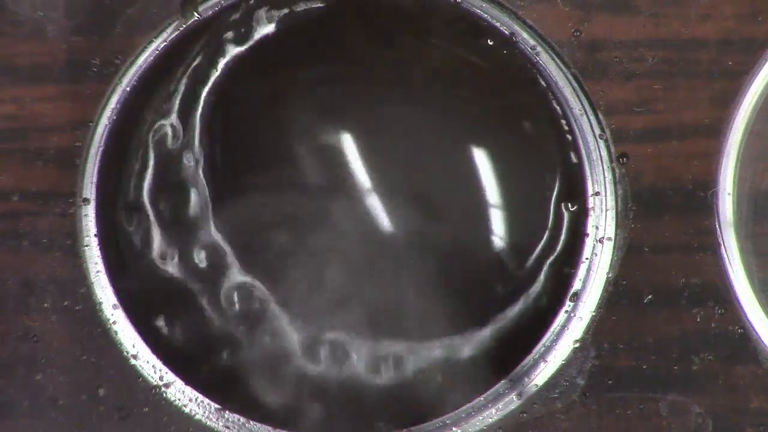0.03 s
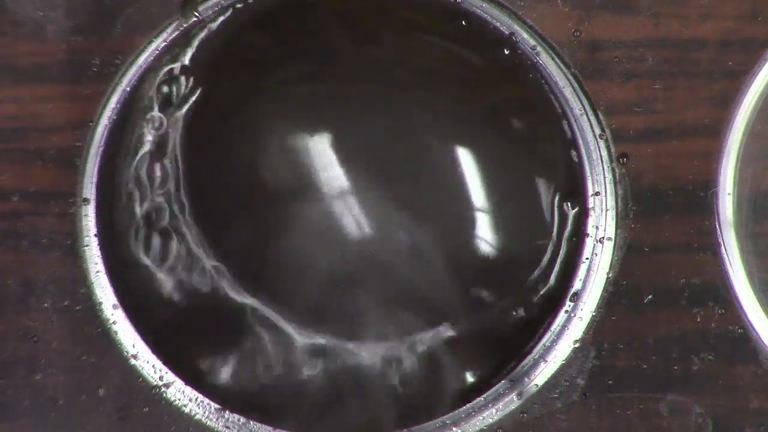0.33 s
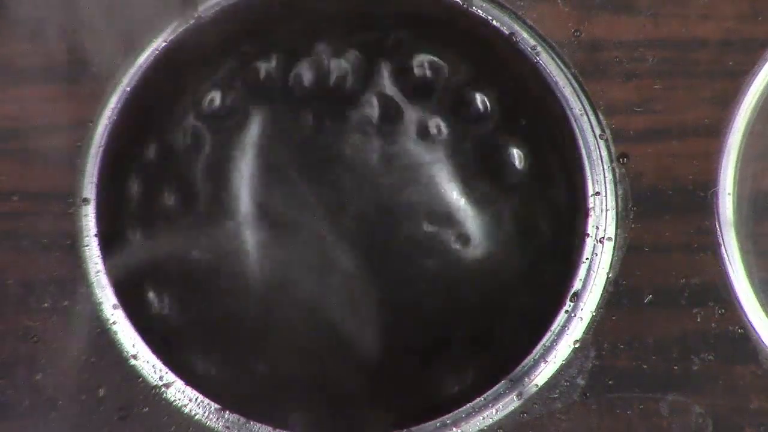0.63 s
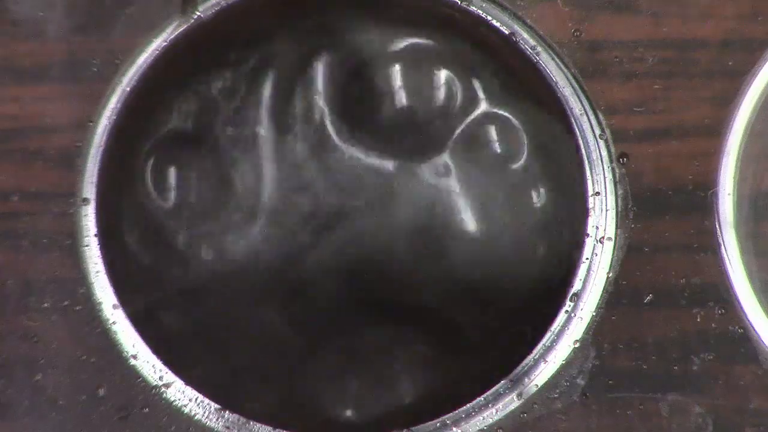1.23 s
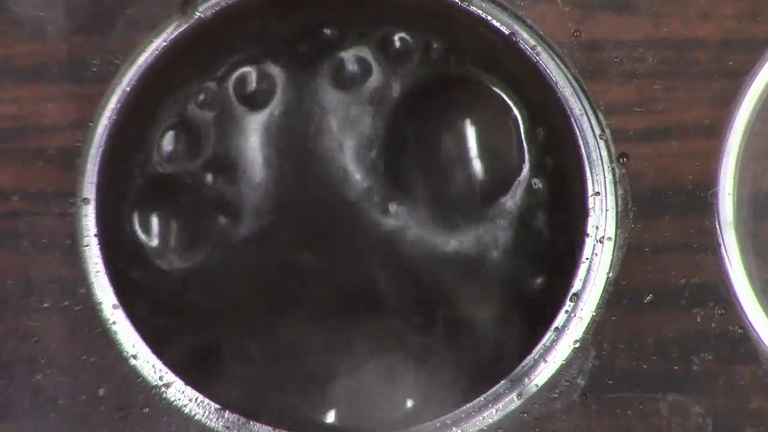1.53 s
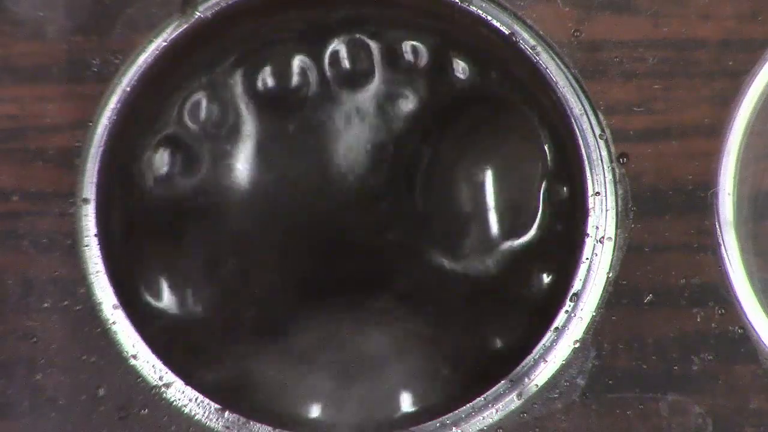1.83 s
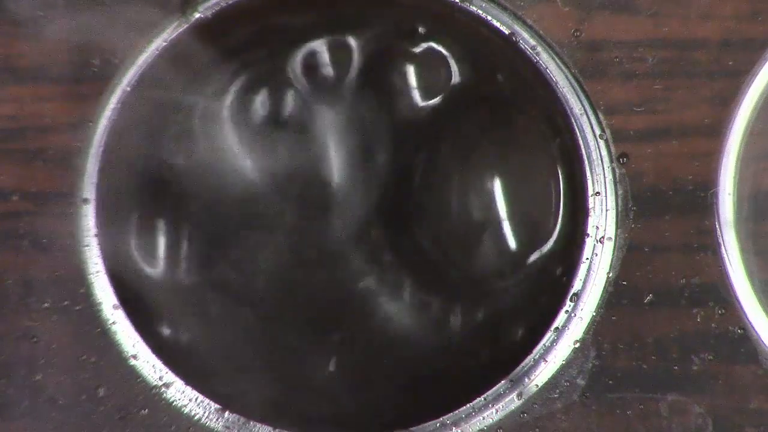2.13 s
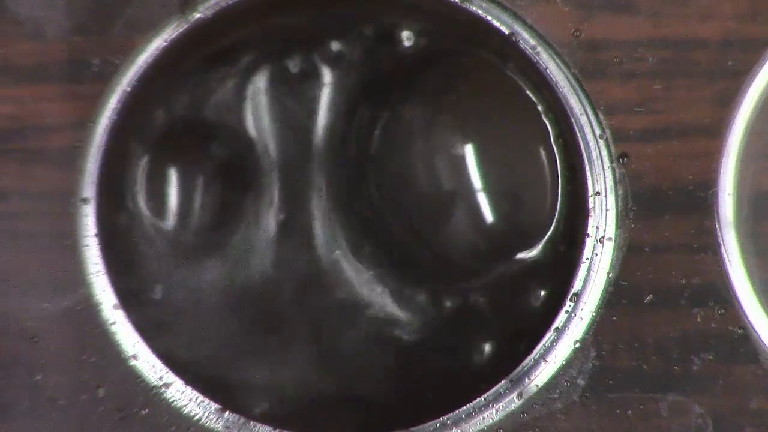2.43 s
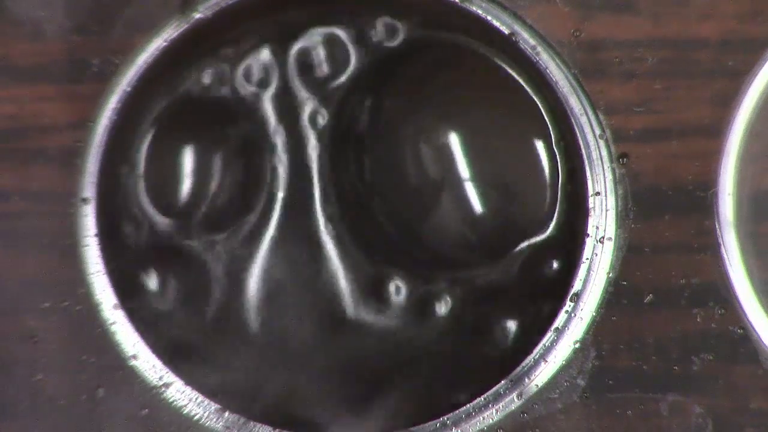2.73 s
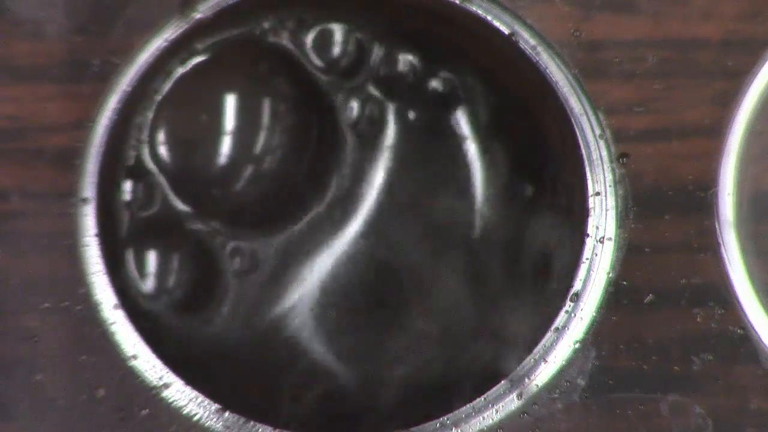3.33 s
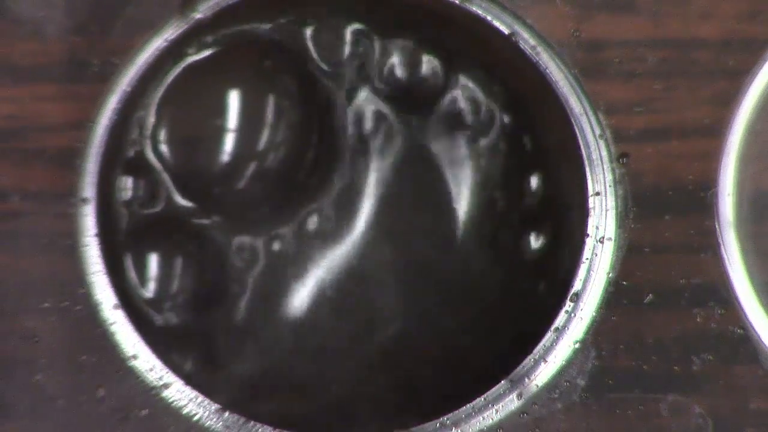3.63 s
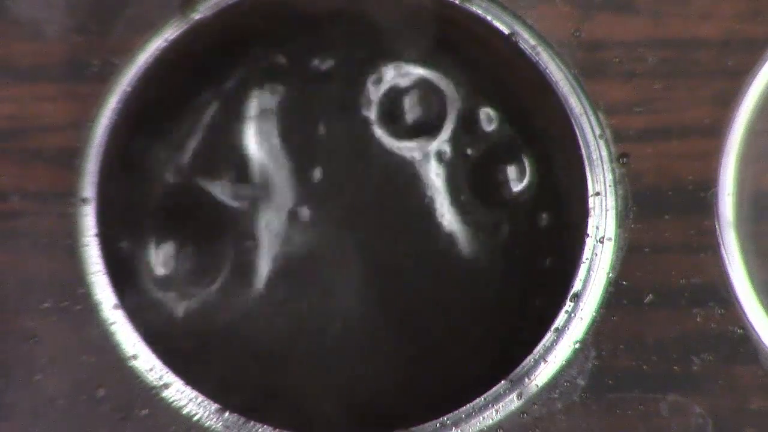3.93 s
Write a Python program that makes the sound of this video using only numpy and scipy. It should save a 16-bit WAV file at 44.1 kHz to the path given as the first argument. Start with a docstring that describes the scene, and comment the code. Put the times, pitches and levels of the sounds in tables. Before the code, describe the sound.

Close fizzing of tiny bubbles bursting in a glass, over a faint low hum.

```python
"""Fizzing glass, close from above

A quiet room, the microphone close over a glass of dark liquid. Countless tiny bubbles burst in
surges, coloured by the air in the glass; a few snap louder. At first one big dome covers the surface,
squeaking and giving a coarser fizz that drops as it bursts; a soft thump follows. A low drone wavers
underneath, and dull room noise lies around the glass."""
import sys
import numpy as np
from scipy import signal
from scipy.io import wavfile

SR = 44100
rng = np.random.default_rng(int(sys.argv[2]) if len(sys.argv) > 2 else 0)


def to_wav(sig):
    """Store sig (one row per channel, or 1-D mono) as 16-bit WAV at the path in sys.argv[1].

    Samples outside -1..1 are clipped; the rate is SR.
    """
    pcm = np.clip(np.atleast_2d(sig), -1, 1) * 32767
    pcm = np.round(pcm).astype(np.int16)
    wavfile.write(sys.argv[1], SR, pcm.T)  # frames by channels


N = 176400
FLUTTER_DB, FLUTTER_PER_S = 0.95, 59   # quick unsteadiness of both kinds of fizz


def from_db(db):
    """Decibels to gain."""
    return 10 ** (np.asarray(db) / 20)


def rms_one(x):
    """Scale to unit power."""
    return x / np.sqrt(np.mean(x ** 2) + 1e-20)


def in_time(rows):
    """Join rows of (seconds, value) by straight lines, at every sample."""
    return np.interp(np.arange(N) / SR, *np.transpose(rows))


def at_hz(points, hz):
    """Read rows of (Hz, value) on a log-frequency axis."""
    freqs, values = np.transpose(points)
    return np.interp(np.log(hz), np.log(freqs), values)


def swell(peak_s, length_s):
    """A bell-shaped gain that stays above half power for length_s."""
    return .5 ** (2 * ((np.arange(N) / SR - peak_s) / length_s) ** 2)


def drift(per_s):
    """A smooth random wander with spread 1; per_s sets its pace."""
    step = 40   # samples between values
    pole = np.exp(-2 * np.pi * per_s * step / SR)
    noise = rng.standard_normal(N // step + 2002)
    slow = signal.lfilter([1], [1, -2 * pole, pole * pole], noise)[2000:]
    return np.interp(np.arange(N) / step, np.arange(len(slow)), rms_one(slow))


def band(x, low_hz, high_hz):
    """Band-pass."""
    return signal.sosfilt(signal.butter(2, [low_hz, high_hz], "band", fs=SR, output="sos"), x + 1e-18)


def soften(x, top_hz):
    """Low-pass."""
    return signal.sosfilt(signal.butter(2, top_hz, fs=SR, output="sos"), x + 1e-18)


def resonate(x, hz, width_hz):
    """A resonance with gain 1 at its peak."""
    r = np.exp(-np.pi * width_hz / SR)
    feedback = [1, -(1 + r * r) * np.cos(2 * np.pi * hz / SR), r * r]
    return signal.lfilter(np.array([1, 0, -1]) * (1 - r * r) / 2, feedback, x + 1e-18)


def glass(x):
    """The air in the glass lifts some pitches and cancels others on the way up to the microphone."""
    # Each row: pitch of an air resonance in Hz, width in Hz, lift in dB (negative for a notch).
    air_resonances = [(947, 57, 9), (1459, 110, 7.5), (1788, 36, 7), (2160, 41, 6.5), (2660, 110, 5),
                      (3007, 25, 5.5), (3350, 190, 4.5), (3972, 60, 7), (4150, 120, 5), (4570, 140, 6),
                      (4885, 60, 4.5), (5240, 90, 4), (5560, 60, 3.5), (6090, 90, 6), (6260, 130, -10),
                      (6460, 70, 5), (6670, 50, 5), (6850, 110, -6), (7000, 80, 4), (7722, 53, 7),
                      (8070, 200, 3.5), (8635, 45, 7.5), (9530, 240, 4.5), (12600, 800, -9.5)]
    for hz, width_hz, lift_db in air_resonances:
        x = x + (from_db(lift_db) - 1) * resonate(x, hz, width_hz)
    return x


def bursts(per_s, spread_db):
    """Bubbles burst as random clicks, many small and few large."""
    sizes = from_db(spread_db * np.minimum(rng.exponential(1, N), 5))
    return sizes * rng.choice([-1, 1], N) * (rng.random(N) < per_s / SR)


def bubbles(colour, per_s, spread_db):
    """Bursting bubbles in 16 size classes, each ringing briefly in its own band; unit power."""
    edges = np.geomspace(850, 16000, 17)
    out = 0
    for low, high in zip(edges, edges[1:]):
        clicks = rms_one(bursts(per_s * (high - low) / np.ptp(edges), spread_db))
        patchy_db = .5 * drift(per_s=28)   # each class comes and goes a little on its own
        gain = from_db(at_hz(colour, np.sqrt(low * high)) + patchy_db)
        out = out + gain * band(clicks, low, high)
    return rms_one(glass(out))


def film_ring(clicks, hz):
    """A snapping film rings for a few cycles; its top is soft."""
    cycles = 8.1   # to die away by 60 dB
    r = np.exp(-np.log(1000) * hz / (cycles * SR))
    ring = signal.lfilter([.5, 0, -.5], [1, -2 * r * np.cos(2 * np.pi * hz / SR), r * r], clicks + 1e-18)
    return soften(ring, top_hz=13300)


def vigour():
    """Strength of the fine fizz: a fluttering bed that surges whenever a patch of foam collapses."""
    # The bed of fizz. Each row: time in seconds, level in dB.
    bed = [(0, -54.5), (.35, -57), (.53, -58.5), (.6, -54.5), (1.3, -54.5), (1.8, -57.5), (2.3, -55),
           (2.85, -56), (3.4, -55.5), (4, -58)]
    # Collapsing foam. Each row: peak time in seconds, length in seconds, level in dB.
    surges = [(0.08, .012, -56), (.241, .036, -56.5), (.483, 0.022, -54), (0.561, 0.018, -49.5),
              (.67, .018, -54.3), (.729, 0.075, -54.5), (0.802, .028, -55.5), (.931, 0.038, -54.5),
              (1.038, 0.058, -55), (1.177, 0.0095, -49.5), (1.227, .025, -53.5), (1.297, 0.047, -53),
              (1.378, 0.014, -55.2), (1.474, 0.075, -55.5), (1.61, .05, -52), (1.687, .06, -56.5),
              (1.758, .035, -51.5), (1.871, 0.054, -54), (1.962, 0.035, -51.5), (2.05, .047, -52.5),
              (2.13, 0.064, -56), (2.199, 0.012, -51.6), (2.284, .028, -52.5), (2.438, 0.015, -56),
              (2.659, .07, -55.5), (2.805, .035, -56.5), (2.932, 0.039, -52.5), (3.091, .03, -51),
              (3.22, .059, -62), (3.624, .028, -55.5), (3.768, .04, -57), (3.85, .038, -56),
              (3.968, .045, -57.5)]
    power = from_db(in_time(bed)) ** 2
    for peak_s, length_s, db in surges:
        power = power + (from_db(db) * swell(peak_s, length_s)) ** 2
    return np.sqrt(power) * from_db(FLUTTER_DB * drift(FLUTTER_PER_S))


def fine_fizz():
    """Tiny bubbles hiss just below the microphone, with a light crackle of small snapping films."""
    # Spectrum of the tiny bubbles. Each row: pitch in Hz, relative spectral level in dB.
    colour = [(1000, -16.5), (2500, -11), (4200, -14.5), (5500, -6), (6800, -0.5), (8100, 1), (10000, -5.5),
              (11600, -2.5), (13400, -5.5), (15000, -22)]
    crackle_hz, crackle_db = (6300, 7800, 9050, 10200), -13.5
    crackle = rms_one(sum(film_ring(bursts(per_s=40, spread_db=2.5), hz) for hz in crackle_hz))
    hiss = bubbles(colour, per_s=36000, spread_db=2)
    return vigour() * (hiss + from_db(crackle_db) * crackle)


def coarse_fizz():
    """Larger bubbles give a hollow fizz, strongest under the dome, which is gone by 0.6 s."""
    # Spectrum of the larger bubbles. Each row: pitch in Hz, relative spectral level in dB.
    colour = [(1000, -3.5), (2000, -2.5), (3600, -2.5), (5000, -1.5), (7000, -7), (15000, -16)]
    # Strength of the coarse fizz. Each row: time in seconds, level in dB.
    levels = [(0, -58.2), (.2, -56.3), (.33, -56.8), (.44, -59), (.53, -59), (.6, -65), (1.2, -63.5),
              (2.05, -65), (2.6, -69.5), (3.2, -68.5), (4, -86)]
    fizz = bubbles(colour, per_s=5800, spread_db=1)
    hollow = rms_one(fizz + 0.42 * (glass(fizz) - fizz))   # a share rings twice in the glass
    return from_db(in_time(levels) + FLUTTER_DB * drift(FLUTTER_PER_S)) * hollow


def drone():
    """One low tone that wavers in pitch, swells and sinks, on a narrow rumble."""
    # Swells of the tone. Each row: time in seconds, level in dB.
    levels = [(0, -52), (.07, -53), (.17, -65), (.21, -52), (.28, -54.5), (.33, -57), (.41, -53),
              (.47, -46.5), (.52, -62), (.56, -54), (.62, -47), (.69, -75), (.78, -56.5), (.86, -60),
              (.92, -47.5), (.99, -56.5), (1.07, -48.5), (1.12, -62), (1.18, -44), (1.28, -59.5),
              (1.35, -53), (1.51, -55.5), (1.57, -43), (1.63, -67), (1.69, -46), (1.74, -64), (1.82, -49),
              (1.9, -52.5), (1.95, -43.5), (2.0, -46.5), (2.03, -55.5), (2.09, -48), (2.135, -57.5),
              (2.18, -46), (2.23, -50.5), (2.33, -52), (2.46, -55), (2.53, -48), (2.58, -52), (2.62, -44.5),
              (2.68, -43.5), (2.73, -55), (2.79, -58), (2.83, -48.5), (2.88, -47.5), (2.93, -60),
              (2.97, -50), (3.05, -65), (3.14, -52.5), (3.24, -50.5), (3.28, -61), (3.46, -61),
              (3.52, -50.5), (3.585, -63), (3.63, -50.5), (3.77, -55.5), (3.84, -45.5), (3.87, -59),
              (3.91, -47), (3.95, -67), (4, -47.5)]
    pitch_hz, waver_hz, flicker_db = 145.8, 4.58, 0.6
    rumble_db, rumble_width_hz = -59.5, 44.3
    hz = pitch_hz + waver_hz * drift(per_s=19)
    gain = from_db(in_time(levels) + flicker_db * drift(per_s=19))
    tone = np.sqrt(2) * np.sin(2 * np.pi * np.cumsum(hz) / SR)
    rumble = band(rng.standard_normal(N), pitch_hz - rumble_width_hz / 2, pitch_hz + rumble_width_hz / 2)
    return gain * tone + from_db(rumble_db) * rms_one(rumble)


def room():
    """Dull, wide room noise around the microphone, fading slightly; part of it rings in the glass."""
    # Spectrum of the room noise. Each row: frequency in Hz, relative spectral level in dB.
    colour = [(20, -20), (40, -18), (65, -13.3), (100, -8), (140, 0.5), (200, 0), (320, 0), (500, -4.5),
              (780, -8), (1050, -8.5), (1800, -15), (3500, -19), (6300, -22), (9000, -29.5), (15000, -30.5)]
    # Stereo width. Each row: frequency in Hz, likeness of left and right (1 is identical).
    likeness = [(25, 0.5), (50, 0.97), (90, 0.89), (150, 0.98), (300, 0.68), (700, 0.49), (1400, 0.55),
                (2500, 0.53), (4000, 0.85), (6300, 0.25), (8500, 1), (12000, 1)]
    # Stereo balance. Each row: frequency in Hz, left minus right in dB.
    balance = [(100, -1), (300, -1.3), (700, -2), (1400, -1.5), (3000, -0.5), (5500, 3), (8000, -1)]
    level_db, flicker_db, fade_db_per_s = -55.5, 0.9, 0.3
    edges = np.geomspace(18, 16000, 21)
    white = rng.standard_normal((2, 2, N + SR // 2))
    left_right = np.array([[1], [-1]])
    out = 0
    for k, (low, high) in enumerate(zip(edges, edges[1:])):
        mid, side = band(white[k % 2], low, high)[:, -N:]   # adjacent bands use independent noise
        hz = np.sqrt(low * high)
        alike = at_hz(likeness, hz)
        gain = from_db(at_hz(colour, hz) + flicker_db * drift(per_s=4.2))
        pan = from_db(left_right * at_hz(balance, hz) / 2)
        out = out + gain * pan * (np.sqrt(1 + alike) * mid + np.sqrt(1 - alike) * side * left_right)
    centre = out.mean(axis=0)
    out = out + 0.29 * (glass(centre) - centre)   # the share that rings in the glass
    return from_db(level_db - fade_db_per_s * np.arange(N) / SR) * rms_one(out)


def snaps():
    """A few bubbles snap above the hiss: the film tears with a dull tick and rings brightly."""
    # Each row: start in seconds, level of the driving click in dB, pitch of the ring in Hz.
    loud_bubbles = [(.1935, -24.5, 10200), (.8475, -35, 7700), (1.0294, -31, 8300), (1.2309, -24.5, 10600),
                    (1.6438, -35, 7800), (2.1563, -32, 8600)]
    out = 0
    for start_s, db, hz in loud_bubbles:
        click = from_db(db) * (np.arange(N) == int(start_s * SR))
        tick = from_db(-8) * soften(click, top_hz=4500)
        out = out + film_ring(click, hz) + tick
    return out


def dome_squeaks():
    """Gas leaks through the big dome in short, narrow puffs that ring in the glass."""
    # Each row: peak time in seconds, length in seconds, level before the glass in dB, pitch in Hz.
    leaks = [(0.261, 0.02, -64, 3130), (0.493, .008, -56, 3520), (0.518, .007, -56.5, 3400)]
    width_hz = 1300
    out = 0
    for peak_s, length_s, db, hz in leaks:
        puff = resonate(resonate(rng.standard_normal(N), hz, width_hz), hz, width_hz)
        out = out + from_db(db) * rms_one(puff) * swell(peak_s, length_s)
    return glass(out)


def thump():
    """One short, soft swell of bass just after the dome has gone."""
    bass = rms_one(band(rng.standard_normal(N), low_hz=45, high_hz=125))
    return from_db(-59) * bass * swell(peak_s=.755, length_s=.045)


def scene():
    """The glass stands in the centre, close under the microphone; the room lies around it."""
    return fine_fizz() + coarse_fizz() + drone() + room() + snaps() + dome_squeaks() + thump()


def record(dry):
    """The microphone signal is cut steeply above 15.7 kHz."""
    return signal.sosfilt(signal.ellip(12, .1, 70, 15700, fs=SR, output="sos"), dry)


dry = scene()
out = record(dry)
to_wav(out)
```